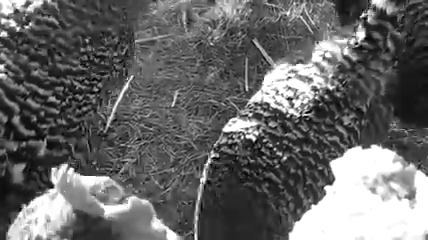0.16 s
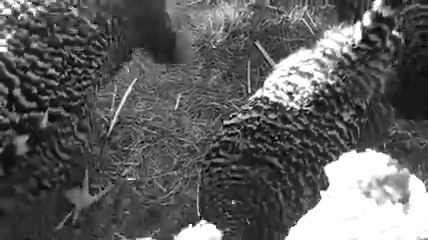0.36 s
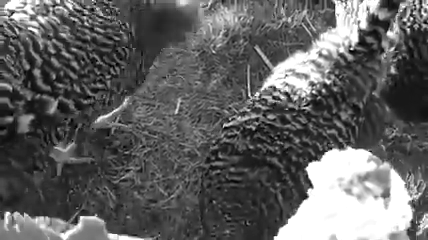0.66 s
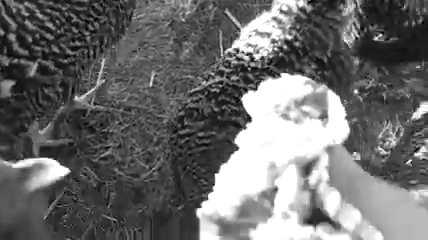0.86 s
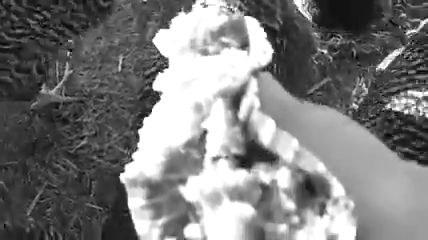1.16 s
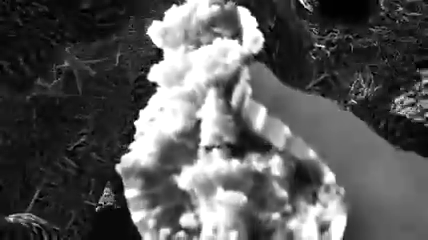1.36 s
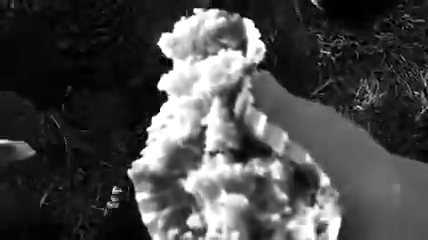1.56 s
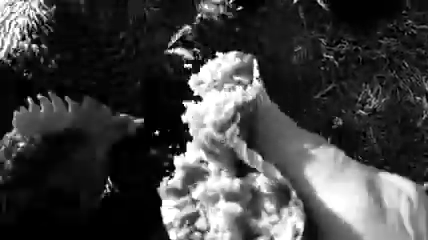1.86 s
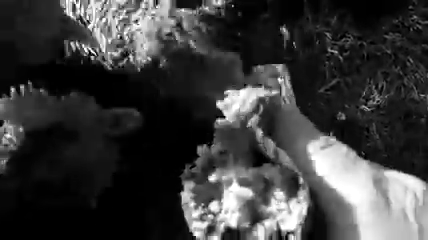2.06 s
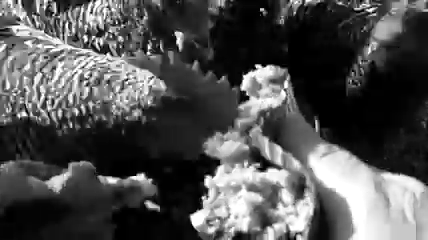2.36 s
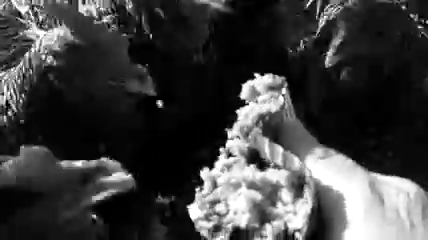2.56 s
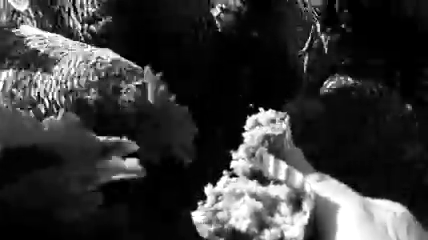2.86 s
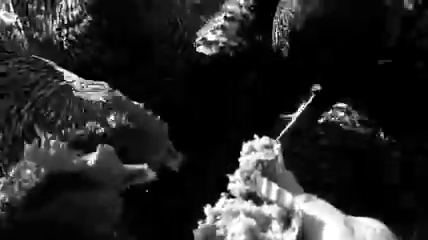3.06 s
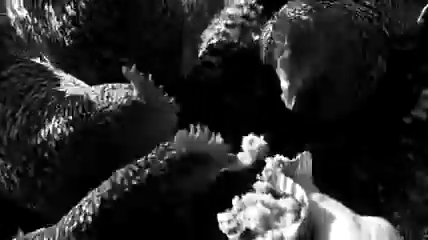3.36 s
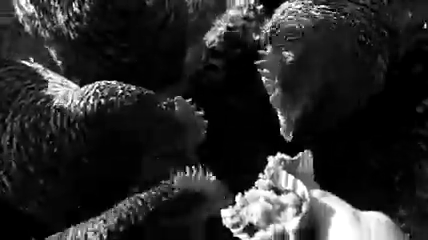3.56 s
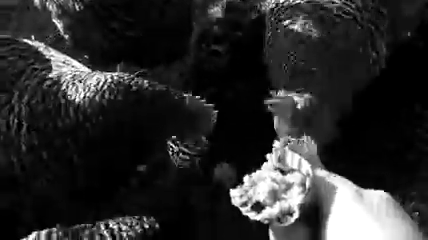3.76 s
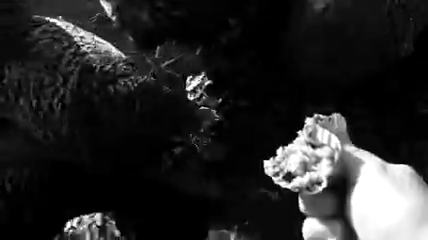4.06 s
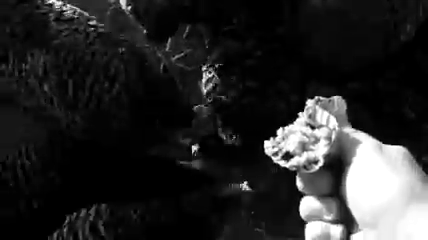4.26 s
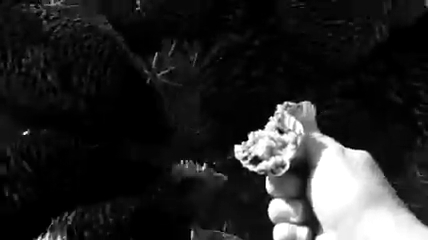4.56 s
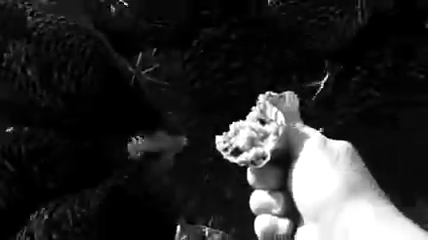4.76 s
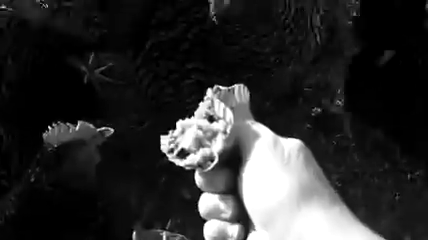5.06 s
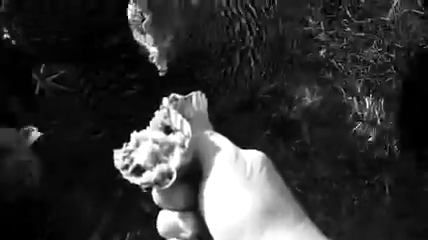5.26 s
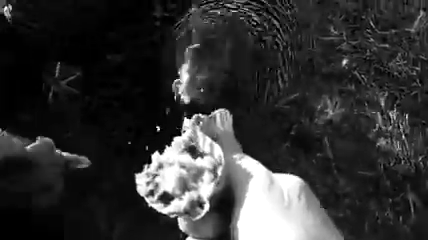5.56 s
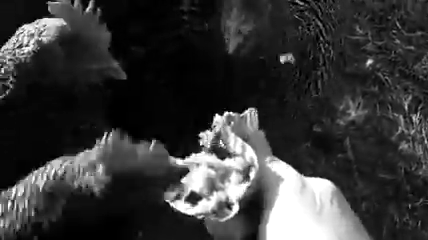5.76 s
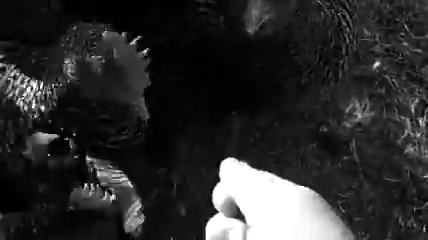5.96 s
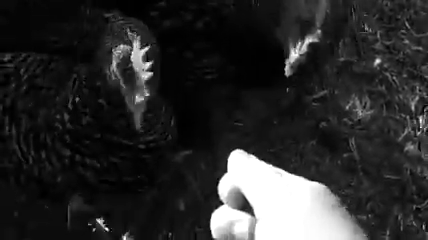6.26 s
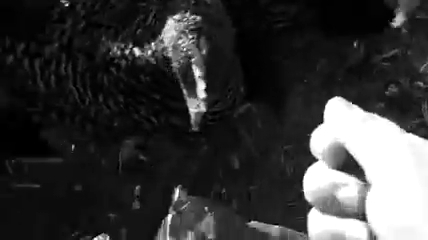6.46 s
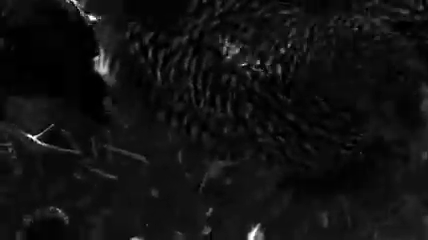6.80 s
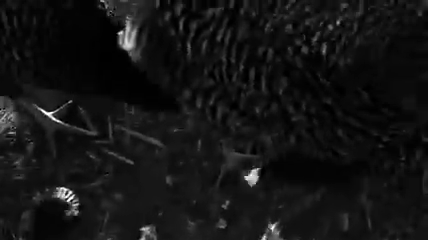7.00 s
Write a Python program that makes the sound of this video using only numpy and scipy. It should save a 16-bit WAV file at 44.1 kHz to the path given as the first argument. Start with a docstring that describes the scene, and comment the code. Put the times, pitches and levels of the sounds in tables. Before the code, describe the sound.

Close by on straw, several hens cluck, give a rising moan, then whine and pip sharply amid quick beak taps and wet smacks.

```python
"""Hens crowd round a hand that holds out bread, outdoors on straw, close by: they cluck, moan, whine and pip.
Each voice is a source and a filter: harmonics of a pulsing syrinx, weighted by a moving throat resonance.
Beak strikes, straw snaps and bumps are damped resonances struck by a click; smacks are ringing bursts of noise.
Feet and feathers rustle as sparse random grains over a low rumble, with shaped noise for the still air.
"""
import sys
import numpy as np
from scipy import signal
from scipy.fft import rfft, irfft, next_fast_len
from scipy.io import wavfile

SR = 44100
rng = np.random.default_rng(int(sys.argv[2]) if len(sys.argv) > 2 else 0)


def dump(signal):
    """Clip the signal to [-1, 1] and save it as 16-bit WAV at the path in sys.argv[1]."""
    limited = np.clip(np.atleast_2d(signal).T, -1, 1)
    pcm = np.round(limited * 32767).astype(np.int16)
    wavfile.write(sys.argv[1], SR, pcm)


N = 314609
TIME = np.arange(N) / SR  # s

# Relative noise spectrum of the still air: [f/Hz, density/dB]
AIR_SPECTRUM = [(50, -23), (120, 4), (300, -3), (500, -31), (1400, -6), (3500, -12), (7000, -14.5),
                (15500, -20)]
# Relative noise spectrum of straw and feathers: [f/Hz, density/dB]
RUSTLE_SPECTRUM = [(150, 0), (400, 3.5), (1700, 1.5), (2500, -4), (3500, -2), (7000, -25), (12000, -22.5)]
# Relative noise spectrum of the low rumble: [f/Hz, density/dB]
RUMBLE_SPECTRUM = [(25, -16), (60, -7.5), (125, 2), (200, -5), (400, 1.5), (1000, -51), (3000, -68)]
# Shuffling of the flock, before the layer gains: [t/s, rustle level/dB, rumble level/dB]
SHUFFLE_LEVELS = [(0.0, -61, -70.5), (6.23, -58.5, -60.5), (7.13, -54, -47)]

# Beak strikes, peak before the layer gain: [t/s, peak level/dB, ring f/Hz, relative crumb level/dB]
BEAK_STRIKES = [(0.5764, -41, 1380, -27), (0.63, -25, 1750, -39), (0.9658, -39.5, 1600, -17),
                (1.0007, -42.5, 1380, -22), (1.4163, -33, 1500, -36), (1.8212, -45, 1410, -18),
                (2.063, -18.5, 1540, -21), (2.7268, -25, 1390, -23), (2.8683, -26, 1180, -17),
                (3.032, -22, 1227, -15), (3.0892, -23.5, 1184, -22), (3.483, -35, 1890, -3.5),
                (3.6876, -39.5, 1800, -16), (3.733, -40, 1730, -28), (4.3258, -38, 1690, -9.5),
                (4.8229, -49, 2030, -8), (5.85, -36, 1110, -11), (6.1789, -27, 1100, -42),
                (6.217, -33.5, 1570, -14.5), (6.4907, -21, 1100, -14.5), (6.6114, -30, 1080, -15.5),
                (6.692, -30.5, 1680, -14.5), (6.7073, -33, 1600, -19), (6.754, -22.5, 1350, -14.5)]
# Wet beak smacks, peak before the layer gain: [t/s, peak level/dB, lower mouth f/Hz, upper mouth f/Hz]
BEAK_SMACKS = [(0.186, -27.5, 1120, 3900), (0.778, -28.5, 680, 1630), (1.186, -15, 1280, 4100),
               (1.291, -29, 1550, 4400), (1.309, -21.5, 1560, 4100), (1.353, -29, 1620, 3200),
               (1.3597, -25.5, 1630, 3100), (1.897, -25, 1790, 3900), (2.219, -28, 1340, 4250),
               (2.234, -28.5, 830, 1870), (3.871, -18, 1410, 3200), (3.956, -28, 2060, 2700),
               (4.822, -24.5, 444, 2170), (5.626, -18, 2726, 6490)]
# Straws snapping under foot, peak before the layer gain: [t/s, peak level/dB, ring f/Hz]
STRAW_SNAPS = [(0.5084, -42.5, 3180), (0.6315, -33, 2690), (2.1036, -41.5, 4000), (2.357, -46, 4260),
               (2.522, -41, 2620), (2.573, -43, 3700), (3.071, -41, 2760), (3.1863, -39.5, 2760),
               (3.29, -38, 2800), (4.1654, -43, 4000), (4.4515, -41.5, 2900), (6.0223, -31.5, 3470),
               (6.169, -34, 2380), (6.1805, -37, 2410), (6.3737, -37.5, 2800), (6.524, -38.5, 2700),
               (6.545, -42.5, 3260)]
# Soft bumps of bodies and feet, before the layer gain and low-pass: [t/s, peak level/dB, ring f/Hz]
BODY_BUMPS = [(0.577, -51, 280), (3.487, -35.5, 295), (3.635, -36.5, 280), (4.092, -32.5, 432),
              (4.861, -48, 220), (5.03, -47.5, 129), (6.189, -40, 273), (6.91, -25, 314)]

# Colour common to all the hens: [f/Hz, level/dB]
THROAT_COLOUR = [(150, 7), (300, 14.5), (600, 5), (1000, 3.5), (1800, -0.5), (2200, -10), (3400, -13),
                 (5000, -24.5), (8000, -32.5)]
# In the note tables f is the pitch before glide and arch; level and brightness are those at the
# peak of the breath, level before the group gain. In the curves level is also before that gain.
# Short, thin begging notes:
# [start t/s, length/s, f/Hz, glide/semitones, level/dB, throat f/Hz, brightness/(dB/octave)]
WHIMPER_NOTES = [ (0.028, 0.022, 918, -2, -40.5, 1250, -1.5), (0.052, 0.011, 655, 0, -42, 790, 2),
                 (2.587, 0.027, 610, -1, -34.5, 640, 19.5), (2.745, 0.054, 598, 1, -37.5, 805, 2),
                 (2.872, 0.059, 630, 1.5, -31.5, 665, 12), (3.042, 0.064, 602, 0, -33, 700, 5),
                 (3.197, .062, 608, 1.5, -29.5, 637, 11), (3.226, 0.027, 690, -6, -35.5, 1410, -19),
                 (3.37, .036, 618, 0, -30, 664, 11), (4.944, 0.021, 540, 4, -52, 1050, -6),
                 (5.811, 0.0585, 618, -1.5, -26.5, 940, 5), (5.875, 0.039, 622, 1, -35.5, 960, -5),
                 (5.996, 0.039, 558, 3, -28.5, 1010, 0.5), (6.034, 0.028, 605, -0.5, -36, 950, -3),
                 (6.768, 0.036, 610, -3, -33.5, 690, 5.5), (6.842, 0.14, 800, 1, -46, 770, -6),
                 (6.927, 0.045, 595, 3, -37.5, 500, 4), (7.053, .024, 920, -12, -39.5, 1026, 3), ]
# High chirps that swoop up and over:
# [start t/s, length/s, f/Hz, glide/semitones, level/dB, throat f/Hz, brightness/(dB/octave)]
CHIRP_NOTES = [ (5.944, 0.052, 648, 0.74, -26.5, 895, 7), (6.118, 0.053, 839, -0.79, -37, 1140, 0.5),
               (6.33, 0.041, 825, -2, -32, 1100, -2.5), (6.375, 0.038, 790, -1.8, -37, 960, 7.5), ]
# Piercing notes, the throat near the second harmonic:
# [start t/s, length/s, f/Hz, glide/semitones, level/dB, throat f/Hz, brightness/(dB/octave)]
PIP_NOTES = [ (4.108, 0.064, 457, -2, -32, 920, 15.5), (5.846, 0.034, 546, 0.5, -21.5, 1080, -1),
             (6.148, 0.04, 496.6, 2.5, -17.5, 970, 6), (6.19, 0.015, 455, -2, -28, 870, 3),
             (6.302, .036, 502, 1.5, -18, 1023, 1.5), (6.336, 0.022, 473, -2, -23, 885, 10),
             (6.473, 0.041, 523, 2, -17.5, 1090, 1), ]
# One hen's long begging whine: [t/s, f/Hz, level/dB]
LOW_WHINE_CURVE = [(5.005, 548, -45), (5.027, 526, -42.5), (5.159, 549, -42), (5.311, 586, -45.5),
                   (5.327, 657, -47.5), (5.373, 723.3, -47.5), (5.481, 614.5, -42), (5.503, 746, -37),
                   (5.527, 676, -46), (5.575, 603, -38.5), (5.739, 573, -37.5), (5.765, 600, -45)]
# A second hen joins in above her: [t/s, f/Hz, level/dB]
HIGH_WHINE_CURVE = [(5.55, 747, -49.5), (5.75, 857, -39), (5.836, 850.0, -43), (5.918, 828, -40.5),
                    (5.99, 910, -37)]
# A long food call that climbs and grows unsteady: [t/s, f/Hz, level/dB]
RISING_MOAN_CURVE = [(2.55, 350.5, -41), (2.578, 335.8, -39), (2.664, 353.3, -38), (2.798, 358.1, -36.5),
                     (2.864, 398.5, -34.5), (2.938, 401, -34), (3.01, 475, -30.5), (3.032, 458, -31.5),
                     (3.058, 477.7, -41), (3.08, 473.6, -37), (3.108, 404.8, -28.5), (3.16, 478, -29.5),
                     (3.19, 425.5, -30), (3.22, 457.4, -27.5), (3.244, 434.7, -35), (3.3, 407, -27),
                     (3.37, 486.9, -29), (3.378, 481, -31)]
# A shorter food call that sags in the middle: [t/s, f/Hz, level/dB]
SAGGING_MOAN_CURVE = [(3.824, 375, -27), (3.848, 399, -31), (3.876, 362, -32), (3.918, 370.6, -34.5),
                      (3.97, 351.5, -34.5), (3.996, 380, -31), (4.06, 394.6, -31), (4.078, 473, -31.5),
                      (4.081, 457, -35)]
# Short, low, pulsed notes:
# [start t/s, length/s, f/Hz, glide/semitones, level/dB, throat f/Hz, brightness/(dB/octave)]
CLUCK_NOTES = [ (0.532, 0.036, 254.8, -1.5, -24.5, 764, -0.5), (1.598, 0.018, 347, 7, -43, 1090, -1.5),
               (1.679, 0.067, 328, -1, -38, 990, -2), (2.4, .048, 282, -5, -30.5, 540, 8),
               (2.448, 0.1, 278, 3.5, -35.5, 670, 1.5), (2.472, 0.056, 362, 4, -34.5, 810, 8),
               (3.551, 0.069, 412, 1.5, -25, 940, -3.5), (5.712, 0.06, 435, 0.5, -26, 670, 5.5),
               (6.799, 0.0436, 420.6, -1, -22.5, 730, 3.5), (6.957, 0.029, 465, 3, -24.5, 675, 3.5),
               (6.987, 0.034, 360, -5.5, -25, 693, 3), ]
# Hollow clucks through a nearly closed beak:
# [start t/s, length/s, f/Hz, glide/semitones, level/dB, throat f/Hz, brightness/(dB/octave)]
HOLLOW_CLUCK_NOTES = [ (4.662, 0.029, 289, -1.45, -23, 904, -3),
                      (4.899, 0.034, 293.4, -0.96, -23.5, 913, -3.5), ]
# Loud clucks from a wide-open beak:
# [start t/s, length/s, f/Hz, glide/semitones, level/dB, throat f/Hz, brightness/(dB/octave)]
SQUAWK_NOTES = [ (0.371, 0.022, 297, 5, -16, 720, 2.5), (0.393, .017, 457, -1, -17.5, 950, -3),
                (3.808, 0.016, 294, 4.5, -24.5, 860, 1), (7.082, 0.049, 322.7, 1.5, -18, 830, 0.5), ]
# Soft notes that swell and sink:
# [start t/s, length/s, f/Hz, glide/semitones, level/dB, throat f/Hz, brightness/(dB/octave)]
COO_NOTES = [ (0.409, 0.051, 492, -6, -30, 626, 6), (0.465, 0.029, 343, -6.5, -33.5, 700, 7),
             (0.609, 0.048, 351, -3.5, -28, 660, 8), ]
# Gruff catches of the voice:
# [start t/s, length/s, f/Hz, glide/semitones, level/dB, throat f/Hz, brightness/(dB/octave)]
GRUNT_NOTES = [ (3.281, 0.0237, 286, -3.5, -29, 1380, -2), (3.446, 0.0073, 254, 2.5, -35.5, 390, 12),
               (4.162, 0.013, 254.4, -7.5, -30.5, 740, 3), (5.322, 0.013, 235, -2.5, -35, 870, -6.5),
               (5.937, 0.0056, 368, 4.5, -24.5, 880, -3.5), (6.103, 0.018, 281, -5.5, -35, 680, 10.5),
               (6.524, 0.0217, 253, -6, -32, 690, 0), (6.753, 0.017, 314, 5, -30.5, 735, 14),
               (7.034, 0.018, 268, -6, -34.5, 670, 7), ]

AIR_DB = -57
WHISTLE_HZ, WHISTLE_DB = 15371, -79.5  # faint whistle of the electronics, rms level
NOTCH_HZ, CUTOFF_HZ = 7700, 15850
FLUTTER_DB = 4.5  # unsteadiness of the upper harmonics
PULSE_SPREAD = 0.64  # share of the throat's phase lag that smears each pulse
VOICE_FLOOR_HZ = 166  # the voices carry little below this
QUAVER_PER_S = 75  # turns of pitch in a strained call


def from_db(db):
    """Level law: 20 dB is a factor of ten in amplitude."""
    return 10 ** (np.asarray(db) / 20)


def rms_one(x):
    """Normalisation to unit mean power."""
    return x / np.sqrt(np.mean(x ** 2) + 1e-20)


def at_hz(points, hz):
    """Interpolation of a spectrum in dB along log frequency."""
    freq, db = np.transpose(points)
    return np.interp(np.log(np.maximum(hz, 1)), np.log(freq), db)


def coloured(x, spectrum):
    """Spectral shaping: multiply the transform by a gain curve; rms 1."""
    size = next_fast_len(len(x))
    hz = np.arange(size // 2 + 1) * SR / size
    shaped = irfft(rfft(x, size) * from_db(at_hz(spectrum, hz)), size)
    return rms_one(shaped[:len(x)])


def drift(t, rate):
    """Random modulation: straight lines between normal draws, `rate` of them a second."""
    steps = (t - t[0]) * rate
    return np.interp(steps, np.arange(4096), rng.standard_normal(4096))


def resonate(x, hz, q):
    """Damped resonance: a pair of poles, gain about 1 at its top."""
    hz = np.clip(hz, 20, SR / 3)
    r = np.exp(-np.pi * hz / (q * SR))
    zeros = np.array([1, 0, -1]) * (1 - r * r) / 2
    poles = [1, -2 * r * np.cos(2 * np.pi * hz / SR), r * r]
    return signal.lfilter(zeros, poles, x + 1e-18)


def low_pass(x, hz, order=2):
    """Treble loss: a maximally flat low-pass."""
    return signal.sosfilt(signal.butter(order, min(hz, SR / 2 - 1), fs=SR, output="sos"), x)


def grains(size, per_s, spread_db):
    """Shot noise: clicks at random times, mostly small and a few large."""
    heights = from_db(spread_db * np.minimum(rng.exponential(1, size), 4))
    heights = heights * rng.choice([-1, 1], size)
    return heights * (rng.random(size) < per_s / SR)


def add(out, s, sound):
    """Superposition: mix a sound in from time s."""
    start = int(np.clip(round(s * SR), 0, N))
    out[start:start + len(sound)] += sound[:N - start]


def still_air():
    """Stationary noise: white noise with a fixed spectrum and level."""
    return from_db(AIR_DB) * coloured(rng.standard_normal(N), AIR_SPECTRUM)


def shuffling(rustle_db, tick_db, rumble_db, patchy_db):
    """Shot noise: feathers rustle in clumps, stalks tick at their own resonances, over a low rumble."""
    s, *columns = np.transpose(SHUFFLE_LEVELS)
    straw_db, low_db = [np.interp(TIME, s, c) for c in columns]
    clump_db = patchy_db * drift(TIME, 30)
    rustle = coloured(grains(N, 2500, 0.84), RUSTLE_SPECTRUM) * from_db(rustle_db + clump_db)
    stalks = sum(resonate(grains(N, 6, 4), hz, 6) for hz in np.geomspace(700, 7000, 16))
    ticks = from_db(tick_db) * coloured(stalks, RUSTLE_SPECTRUM)
    straw = low_pass(rustle + ticks, 9500, order=4)
    rumble = coloured(rng.standard_normal(N), RUMBLE_SPECTRUM)
    return straw * from_db(straw_db) + rumble * from_db(low_db + rumble_db)


def yard(x, wet_db, t60):
    """Diffuse scattering: a short, dull, decaying echo from the ground and the birds around."""
    t = np.arange(SR // 3) / SR
    scatter = low_pass(rng.standard_normal(len(t)), 5200)
    scatter = scatter * from_db(-60 * t / t60) * (t > .003)
    scatter = scatter / np.linalg.norm(scatter)
    return x + from_db(wet_db) * signal.fftconvolve(x, scatter)[:N]


def strike(hz, q, soft_hz, crumbs_db, crumbs_s):
    """Impulse response: a damped click of height 1, with crumbling grains in the same resonance."""
    t = np.arange(SR // 8) / SR
    crumbling = rms_one(grains(len(t), 3000, 5.5)) * np.exp(-t / crumbs_s) / 4
    force = from_db(crumbs_db) * crumbling
    click = signal.unit_impulse(len(t))
    clean, crumbs = low_pass(resonate(np.array([click, force]), hz, q), soft_hz, order=1)
    return (clean + crumbs) / abs(clean).max()


def smack(low_hz, high_hz, q, swell_s):
    """Forced resonance: a brief wet fizz, as a beak parts, rings in two mouth resonances; height 1."""
    t = np.arange(SR // 25) / SR
    fizz = rng.standard_normal(len(t)) * t * np.exp(-t / swell_s)
    ringing = resonate(fizz, low_hz, q) - 0.74 * resonate(fizz, high_hz, q)
    sound = low_pass(ringing, 7200)
    return sound / abs(sound).max()


def feeding(peck_db, snap_db, bump_db, smack_db):
    """Impact excitation: beaks hit the bread and smack, straws snap and bodies bump."""
    out = np.zeros(N)
    for s, db, hz in BODY_BUMPS:
        thud = strike(hz, q=0.37, soft_hz=506, crumbs_db=-13, crumbs_s=0.018)
        add(out, s, from_db(db + bump_db) * low_pass(thud, 3100))
    for s, db, hz in STRAW_SNAPS:
        snap = strike(hz, q=2.14, soft_hz=5030, crumbs_db=-2, crumbs_s=0.0087)
        add(out, s, from_db(db + snap_db) * snap)
    for s, db, low_hz, high_hz in BEAK_SMACKS:
        add(out, s, from_db(db + smack_db) * smack(low_hz, high_hz, q=7.7, swell_s=0.0015))
    for s, db, hz, crumbs_db in BEAK_STRIKES:
        peck = strike(hz, q=1.17, soft_hz=1340, crumbs_db=crumbs_db, crumbs_s=0.027)
        add(out, s, from_db(db + peck_db) * peck)
    return out


def call(rows, q, jitter, doubling, rasp_db, treble_db, edge_s):
    """Source and filter: a pulsing syrinx gives harmonics that a moving throat resonance shapes."""
    s, *columns = np.transpose(rows)
    t = np.arange(s[0] - edge_s / 2, s[-1] + edge_s / 2, 1 / SR)
    pitch, level_db, throat_hz, brightness = [np.interp(t, s, c) for c in columns]
    unsteady_pitch = pitch * (1 + jitter * (drift(t, 400) + drift(t, 58.2)))
    phase = 2 * np.pi * np.cumsum(unsteady_pitch) / SR
    k = np.arange(1, 25)[:, None]  # harmonic numbers
    hz = k * pitch
    throat = 1 / (1 + 1j * q * (hz / throat_hz - throat_hz / hz))
    # an open beak lifts the middle harmonics; the top ones depend on how hard the syrinx snaps shut
    opening_db = brightness * np.log2(np.minimum(hz, 1900) / 800)
    snap_db = treble_db * np.clip((hz - 1800) / 500, 0, 1)
    # the upper harmonics flutter as the head moves
    flutter_db = FLUTTER_DB * np.minimum(hz / 1500, 1) * np.array([drift(t, 110.4) for _ in k])
    colour_db = at_hz(THROAT_COLOUR, hz) + opening_db + snap_db + flutter_db
    partials = abs(throat) * from_db(colour_db)
    partials = partials / np.sqrt(np.sum(partials ** 2, axis=0) / 2)
    lag = PULSE_SPREAD * np.angle(throat)
    buzz = np.sum(partials * np.cos(k * phase + lag), axis=0)
    # strong and weak cycles alternate when the voice breaks
    buzz = buzz * (1 + doubling * (np.cos(phase / 2) + drift(t, 310) / 2))
    # air escapes in a puff each cycle and rasps in the same throat
    puffs = rng.standard_normal(len(t)) * (1 + np.cos(phase))
    rasp = coloured(resonate(puffs, np.mean(throat_hz), 3.7), THROAT_COLOUR)
    fade = np.clip(np.minimum(t - t[0], t[-1] - t) / edge_s, 0, 1)
    return from_db(level_db) * np.sin(fade * np.pi / 2) * (buzz + from_db(rasp_db) * rasp)


def hens(calls, gain_db, edge_s, **voice):
    """Superposition: all calls of one kind under one gain."""
    out = np.zeros(N)
    for rows in calls:
        add(out, rows[0][0] - edge_s / 2, call(rows, edge_s=edge_s, **voice))
    return from_db(gain_db) * out


def notes(table, peak_at, swell_db, arch_semitones, dulling_db):
    """Breath pressure: one push moves level, pitch and brightness along a peaked arch, with a glide."""
    u = np.linspace(0, 1, 25)  # share of the note gone by
    peak = np.clip(peak_at, .05, .95)
    slack = np.maximum((peak - u) / peak, (u - peak) / (1 - peak)) ** 2
    calls = []
    for s, length, hz, glide, db, throat_hz, brightness in table:
        semitones = glide * (u - .5) - arch_semitones * slack
        calls.append(np.column_stack([s + length * u, hz * 2 ** (semitones / 12), db - swell_db * slack,
                                      np.full_like(u, throat_hz), brightness - dulling_db * slack]))
    return calls


def held(curves, rest_hz, throat_hz, throat_follows, brightness_db, brightness_db_per_octave,
         opening_db, closing_s, quaver):
    """Vocal tension: throat and brightness follow the pitch, which quavers above rest_hz.

    The brightness starts off by opening_db, which dies away as the beak closes."""
    calls = []
    for s, pitch, db in map(np.transpose, curves):
        t = np.linspace(s[0], s[-1], 400)
        pitch = np.interp(t, s, pitch)
        octaves = np.log2(pitch / rest_hz)
        wobble = 1 + quaver * np.maximum(octaves, 0) * drift(t, QUAVER_PER_S)
        onset = opening_db * np.exp(-(t - t[0]) / closing_s)
        brightness = brightness_db + brightness_db_per_octave * octaves + onset
        throat = throat_hz * 2 ** (throat_follows * octaves)
        calls.append(np.column_stack([t, pitch * wobble, np.interp(t, s, db), throat, brightness]))
    return calls


def begging():
    """Sharp resonance: a narrowed throat gives thin, high whines, whimpers, chirps and pips."""
    calls = held([LOW_WHINE_CURVE, HIGH_WHINE_CURVE], rest_hz=554, throat_hz=1031, throat_follows=.2,
                 brightness_db=-10, brightness_db_per_octave=4.5, opening_db=-0.5, closing_s=0.37,
                 quaver=0.0252)
    whines = hens(calls, gain_db=4, q=25, jitter=0.0092, doubling=0.017, rasp_db=-17.5,
                  treble_db=9, edge_s=0.0051)
    whimpers = hens(notes(WHIMPER_NOTES, peak_at=0.54, swell_db=6, arch_semitones=1.42, dulling_db=5),
                    gain_db=3.0, q=19.6, jitter=0.014, doubling=0.026, rasp_db=-15.5,
                    treble_db=-2, edge_s=0.00542)
    chirps = hens(notes(CHIRP_NOTES, peak_at=0.494, swell_db=2.5, arch_semitones=2.89, dulling_db=4.5),
                  gain_db=1.5, q=11, jitter=0.012, doubling=0.041, rasp_db=-14,
                  treble_db=1.5, edge_s=0.005)
    pips = hens(notes(PIP_NOTES, peak_at=0.47, swell_db=12.5, arch_semitones=0.5, dulling_db=5.5),
                gain_db=-3, q=16, jitter=0.011, doubling=0.18, rasp_db=-11.5,
                treble_db=8.5, edge_s=0.0032)
    return whines + whimpers + chirps + pips


def moaning():
    """Resonance tracking: as a drawn-out food call climbs, the throat favours the second harmonic."""
    calls = held([RISING_MOAN_CURVE, SAGGING_MOAN_CURVE], rest_hz=355, throat_hz=522, throat_follows=2.05,
                 brightness_db=3, brightness_db_per_octave=-27, opening_db=5, closing_s=0.092, quaver=0.048)
    return hens(calls, gain_db=4.0, q=3.8, jitter=0.016, doubling=0.05, rasp_db=-21,
                treble_db=-4, edge_s=0.0056)


def clucking():
    """Low pulsed phonation: abrupt and hollow clucks, open squawks, soft coos and gruff grunts."""
    clucks = hens(notes(CLUCK_NOTES, peak_at=0.3, swell_db=5.5, arch_semitones=1.2, dulling_db=3.5),
                  gain_db=1.5, q=4.7, jitter=0.016, doubling=0.05, rasp_db=-16.5,
                  treble_db=0, edge_s=0.00378)
    hollow = hens(notes(HOLLOW_CLUCK_NOTES, peak_at=0.15, swell_db=7.5, arch_semitones=0.25, dulling_db=1),
                  gain_db=1.5, q=10, jitter=0.0099, doubling=0.02, rasp_db=-16,
                  treble_db=-1, edge_s=0.0037)
    squawks = hens(notes(SQUAWK_NOTES, peak_at=0.26, swell_db=5.5, arch_semitones=0.55, dulling_db=-3.5),
                   gain_db=-0.5, q=3.2, jitter=0.019, doubling=0.02, rasp_db=-20,
                   treble_db=-1.5, edge_s=0.00203)
    coos = hens(notes(COO_NOTES, peak_at=0.39, swell_db=14, arch_semitones=1.55, dulling_db=14),
                gain_db=1.5, q=5.4, jitter=0.016, doubling=0.03, rasp_db=-16,
                treble_db=-10, edge_s=0.0036)
    grunts = hens(notes(GRUNT_NOTES, peak_at=0.18, swell_db=8, arch_semitones=0.5, dulling_db=4),
                  gain_db=0.5, q=6.9, jitter=0.039, doubling=0.18, rasp_db=-1,
                  treble_db=3.5, edge_s=0.00307)
    return clucks + hollow + squawks + coos + grunts


def scene():
    """Superposition of still air, straw, feeding and voices; only the last two are scattered."""
    ground = shuffling(rustle_db=3.5, tick_db=2.0, rumble_db=-3.5, patchy_db=2.5)
    low_cut = signal.butter(2, VOICE_FLOOR_HZ, "high", fs=SR, output="sos")
    voices = signal.sosfiltfilt(low_cut, begging() + moaning() + clucking())
    flock = voices + feeding(peck_db=6.0, snap_db=5.5, bump_db=8, smack_db=-7.5)
    return (yard(flock, wet_db=-29.0, t60=0.083) + ground + still_air())[None]


def record(dry):
    """Band limiting: the recorder adds a faint whistle, has a narrow notch and cuts the top."""
    whistle = from_db(WHISTLE_DB) * np.sqrt(2) * np.sin(2 * np.pi * WHISTLE_HZ * TIME)
    notched = dry + whistle - .85 * resonate(dry, NOTCH_HZ, 16)
    return signal.sosfilt(signal.ellip(12, .1, 80, CUTOFF_HZ, fs=SR, output="sos"), notched)


dry = scene()
out = record(dry)
dump(out)
```